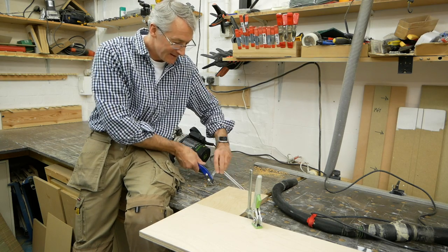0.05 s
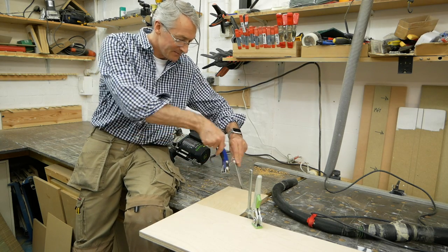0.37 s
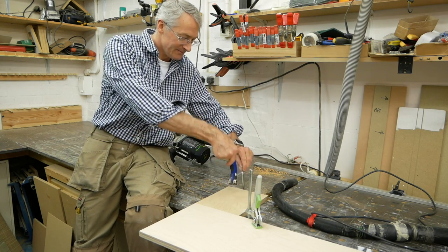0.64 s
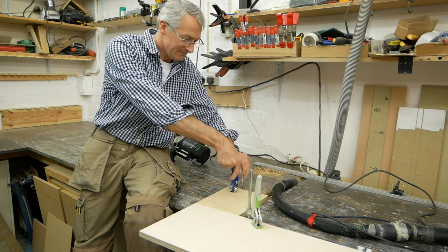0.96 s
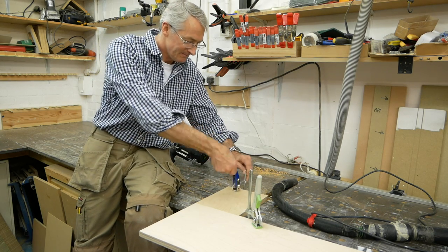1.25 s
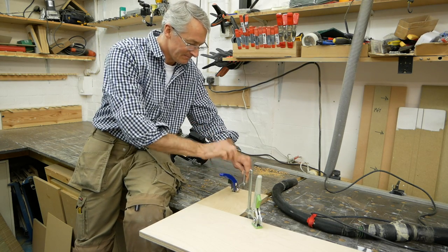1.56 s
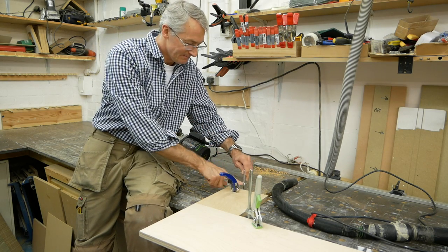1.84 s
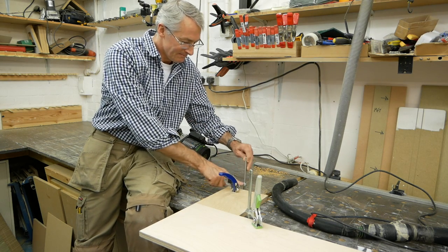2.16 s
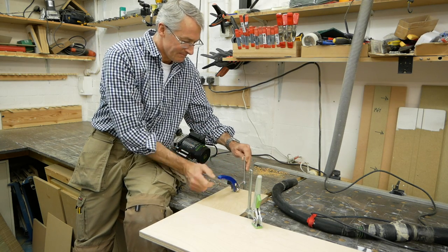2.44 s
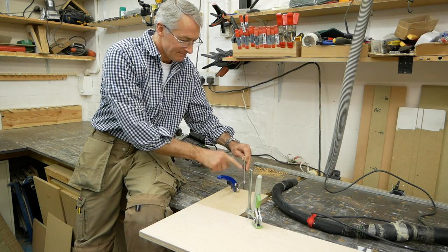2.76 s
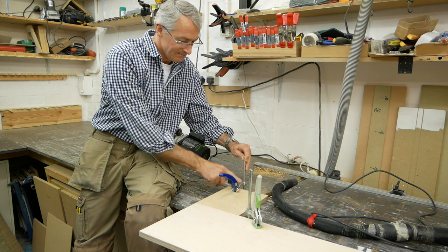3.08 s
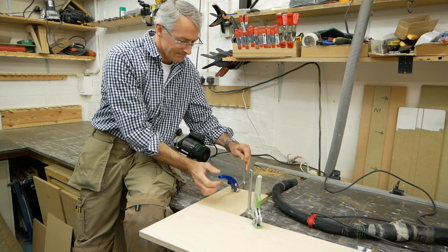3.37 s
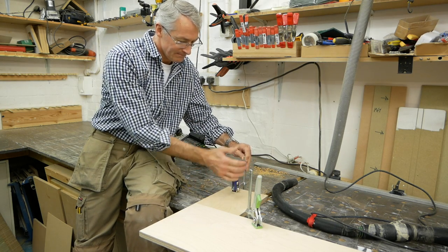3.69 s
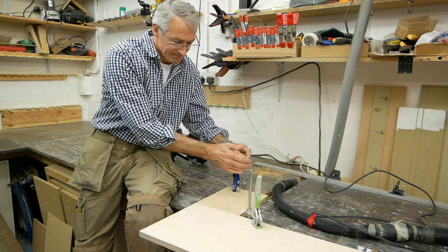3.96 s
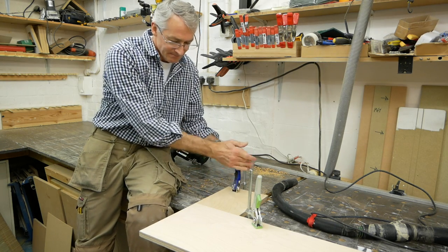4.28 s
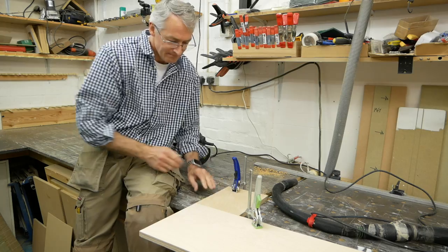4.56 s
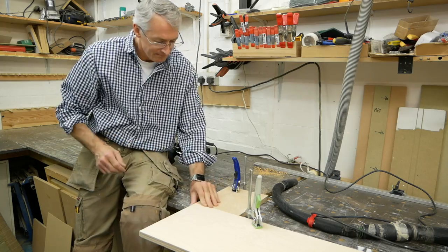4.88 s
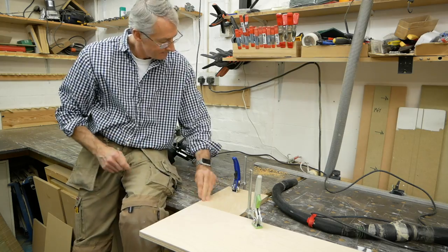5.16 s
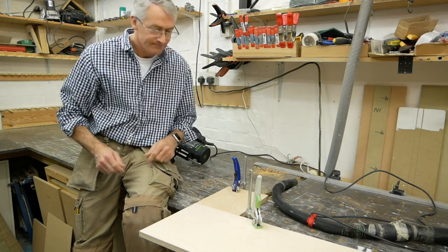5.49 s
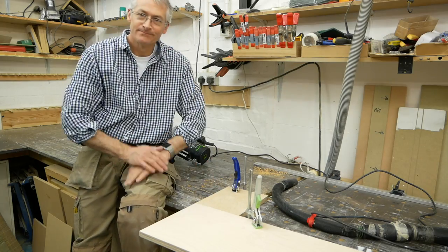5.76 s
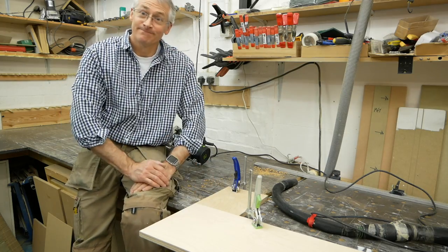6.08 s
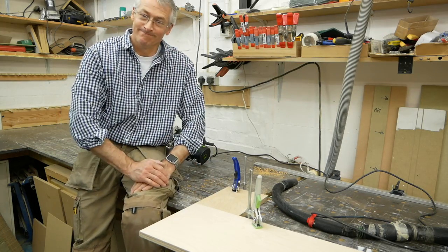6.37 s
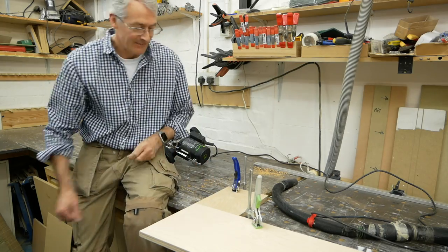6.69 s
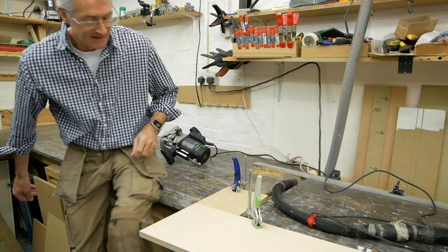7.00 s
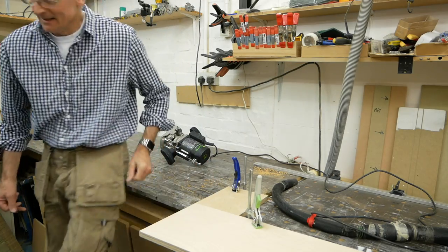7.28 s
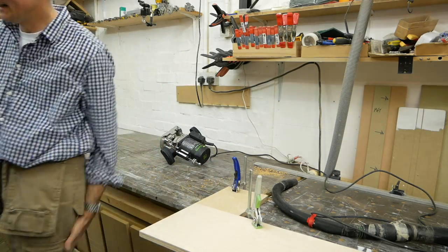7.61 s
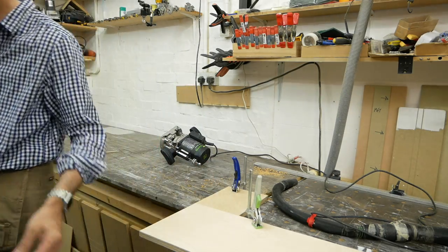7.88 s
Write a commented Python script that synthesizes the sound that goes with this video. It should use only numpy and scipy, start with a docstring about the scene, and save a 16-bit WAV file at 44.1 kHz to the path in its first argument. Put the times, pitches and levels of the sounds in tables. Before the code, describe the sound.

In a small workshop, close to the microphone, someone fits a metal clamp onto a board. Irregular steel clacks and wooden knocks make the bench boom softly. A short scrape leads to a few duller clunks as the screw is turned, then to the sharpest clacks. The second half is much softer, with swishing clothes, a couple of pats and some light footsteps over faint room hiss.

```python
"""A steel clamp is set on a board on a wooden workbench; a man slides its jaw down and screws it tight.
Each impact excites damped modes: the steel clacks and clinks, the board knocks, the bench booms,
and a small workshop reverberates. Stick-slip friction makes the jaw scrape and the bar sing.
He lets go, brushes the board, pats his trousers and walks off in rustling clothes, near one microphone."""
import sys
import numpy as np
from scipy import signal
from scipy.io import wavfile
from scipy.ndimage import uniform_filter1d

SR = 44100
rng = np.random.default_rng(int(sys.argv[2]) if len(sys.argv) > 2 else 0)


def output_pcm(signal):
    """Save a mono or channel-first signal as 16-bit PCM at the path in sys.argv[1].

    Samples are clipped to [-1, 1] before scaling.
    """
    pcm = np.clip(np.atleast_2d(signal).T, -1, 1) * 32767
    wavfile.write(sys.argv[1], SR, np.round(pcm).astype(np.int16))


N = 350154
TIME = np.arange(N) / SR
RING = np.arange(20480) / SR  # time since a blow [s]

# spectra of contact on wood and on thin steel: (frequency [Hz], level [dB])
WOOD_SPECTRUM = [(70, -15.5), (200, 2), (400, 4), (640, -1), (1000, -10.5), (1800, -19), (5000, -60)]
TICK_SPECTRUM = [(1500, -2.5), (4000, 3.5), (6500, 4), (9500, -0.5), (12500, 1.5), (16000, -7.5)]


def amp(db):
    return 10 ** (np.asarray(db) / 20)


def unit_rms(x):
    return x / np.sqrt(np.mean(x ** 2) + 1e-20)


def unit_energy(x):
    return x / np.sqrt(np.sum(x ** 2) + 1e-20)


def with_energy(x, seconds):
    """Energy is power times duration: x gets that of a unit-power sound of this length."""
    return unit_energy(x) * np.sqrt(seconds * SR)


def curve_at(points, hz):
    """Linear interpolation on a log-frequency axis."""
    f, value = np.transpose(points)
    return np.interp(np.log(hz + 1), np.log(f + 1), value)


def add(mix, s, sound):
    part = mix[max(round(s * SR), 0):][:len(sound)]
    part += sound[:len(part)]


def colour(x, spectrum, centre_hz=1000, bump_db=0, octaves=.5):
    """Minimum-phase filtering by a spectrum with an optional broad resonance."""
    hz = abs(np.fft.fftfreq(4096, 1 / SR))
    db = curve_at(spectrum, hz) + bump_db * np.exp(-(np.log2((hz + 1) / centre_hz) / octaves) ** 2)
    response = np.exp(np.conj(signal.hilbert(np.log(amp(db)))))
    taps = np.fft.ifft(response).real
    return signal.oaconvolve(x, unit_energy(taps[:len(taps) // 2]))[:len(x)]


def decay(t60):
    """Exponential damping: 60 dB in t60 seconds."""
    return np.exp(-np.log(1000) * RING / t60)


def ring(modes, centre_hz, favour_db=6):
    """Modal superposition: damped sines of random sign, favoured near the struck spot's resonance."""
    out = np.zeros(len(RING))
    for hz, db, t60 in modes:
        nearness = np.exp(-(np.log2(hz / centre_hz) / 0.37) ** 2)
        out += rng.choice([-1, 1]) * amp(db + favour_db * nearness) * decay(t60) * np.sin(2 * np.pi * hz * RING)
    return unit_energy(out)


def room(build_s):
    """Diffuse reverberation: dense reflections build up, then decay band by band."""
    # reverberation of the workshop: (frequency [Hz], t60 [s])
    decay_times = [(150, 0.56), (600, 0.29), (3600, 0.25), (7000, 0.31), (14000, 0.14)]
    hz, t, bands = signal.stft(rng.standard_normal(len(RING)), SR, nperseg=256)
    absorption = np.exp(-np.log(1000) * t / curve_at(decay_times, hz)[:, None])
    tail = signal.istft(bands * absorption, SR, nperseg=256)[1][:len(RING)]
    return unit_energy(tail * (1 - np.exp(-RING / build_s)))


def impact(chatter_db, chatter_t60, wet_db, build_s):
    """Impulsive excitation: a pulse and brief contact chatter, prolonged by reverberation."""
    chatter = unit_energy(rng.standard_normal(len(RING)) * decay(chatter_t60))
    direct = (RING == 0) + amp(chatter_db) * chatter
    return unit_energy(direct + amp(wet_db) * signal.fftconvolve(direct, room(build_s))[:len(RING)])


def friction(spectrum, grain_db, per_s):
    """Stick-slip friction: random slips of uneven size, smeared by reverberation."""
    slips = (rng.random(N) < per_s / SR) * rng.standard_normal(N)
    slips *= amp(grain_db * np.minimum(rng.exponential(1, N), 4))
    return unit_rms(colour(slips + signal.oaconvolve(slips, room(build_s=0.041))[:N], spectrum))


def strokes(rows, main, second):
    """Friction noise follows speed: two noises swell and fade under each stroke's Gaussian envelope."""
    return sum(amp(db) * np.exp(-.5 * ((TIME - s) / half_s) ** 2) * (main + amp(second_db) * second)
               for s, db, half_s, second_db in rows)


def air():
    """Stationary noise floor: the quiet workshop and the microphone's own hiss."""
    # background spectrum: (frequency [Hz], level [dB])
    floor_spectrum = [(20, -14.5), (92, 5), (560, -14), (2690, -22), (4610, -23.5), (13200, -26),
                      (16000, -23.5)]
    return amp(-56.5) * unit_rms(colour(rng.standard_normal(N), floor_spectrum))


def clothes():
    """Cloth friction: folds rustle and fibres hiss, modulated as they catch and let go."""
    # spectra of folds and of fibres: (frequency [Hz], level [dB])
    fold_spectrum = [(50, 4), (150, 5.5), (330, 4.5), (550, 4.5), (1100, 2), (3700, -0.5), (4800, -11.5),
                     (15000, -28.5)]
    fibre_spectrum = [(2500, -3.5), (6000, -8.5), (13000, -10), (16000, -22)]
    # body movement, its first level held from the start: (time [s], level [dB])
    movement = [(4.6, -53.5), (5.3, -54.5), (5.7, -49.5), (6.3, -62), (6.55, -49), (7.4, -46), (7.94, -54)]
    # the hand brushing the board (4.81 and 5.23 s), then sleeves and trousers: (centre time [s], level [dB],
    # half width [s], relative hiss [dB])
    swishes = [(4.81, -54, 0.063, 5.5), (4.925, -38.5, 0.039, -24), (5.11, -44.5, 0.069, -22),
               (5.23, -50.5, 0.054, 0), (5.94, -54, 0.063, -1), (6.83, -56, 0.033, 0),
               (7.135, -29, 0.052, -12), (7.745, -40.5, 0.061, -2.5)]
    catch_db = unit_rms(signal.sosfilt(signal.butter(2, 25, fs=SR, output="sos"), rng.standard_normal(N)))
    rustle = friction(fold_spectrum, grain_db=1.5, per_s=5000)
    hiss = friction(fibre_spectrum, grain_db=-1, per_s=8300)
    stir = amp(np.interp(TIME, *np.transpose(movement))) * (rustle + amp(-9) * hiss)
    return amp(catch_db) * (stir + strokes(swishes, rustle, hiss))


def bench(boom_db, tilt_db):
    """Rise time sets bandwidth: a slow push swells the deep modes, a quick one the upper ones too."""
    # bench modes: (frequency [Hz], level [dB], t60 [s])
    modes = [(97.86, 8, 0.42), (84.45, -2, 0.42), (67.4, -11, 0.35), (126, -4, 0.42), (155, -1, 0.55),
             (183.8, 1, 0.46), (238.5, -2.5, 0.36), (293, -3, 0.3)]
    build_s = 0.024 * amp(-tilt_db) ** .5
    swell = np.sin(np.pi / 2 * np.minimum(RING / build_s, 1)) ** 2
    # the first swing rings slightly louder, then the level settles a little lower
    damping = 0.66 + 0.069 * np.exp(-(np.maximum(RING - build_s, 0) / 0.064) ** 2)
    boom = sum(amp(db + tilt_db * np.log2(hz / 100)) * decay(t60)
               * np.sin(2 * np.pi * (hz * RING + rng.random())) for hz, db, t60 in modes)
    return amp(boom_db) * swell * damping * boom


def leaning():
    """Transient loading: pushes and dull bumps set the bench vibrating."""
    # loads on the bench top: (time [s], level [dB], tilt [dB/octave])
    pushes = [(0.0, -25, 12), (0.034, -15, 1), (0.12, -16.5, 0), (0.207, -18.5, -6), (0.993, -23, 1),
              (1.124, -30, 0), (2.002, -19.5, -7.5), (2.071, -25, -2), (4.024, -14.5, -9.5),
              (4.396, -15.5, 0.5), (4.425, -15, -6.5), (7.132, -23.5, -4)]
    out = np.zeros(N)
    for s, db, tilt_db in pushes:
        add(out, s, bench(db, tilt_db))
    return out


def bar_ring(tuning):
    """Free vibration of the thin steel bar: the jaw's place sets the ringing length, hence the tuning."""
    # bar modes: (frequency at tuning 1 [Hz], level [dB], t60 [s])
    modes = [(5642, 3, .11), (7251, 0, .25), (8400, -6, .17), (10450, -3, .19), (13216, -4, .2)]
    return ring([(hz * tuning, db, t60) for hz, db, t60 in modes], centre_hz=modes[0][0])


def strike(clack_db, body_db, tick_db, hz, ring_db):
    """Impact on coupled parts: one blow sounds the cast jaw, the board under it and the bar."""
    # spectrum of the jaw's clack: (frequency [Hz], level [dB])
    clack_spectrum = [(300, -50.5), (700, -10.5), (950, -2.5), (1750, -5.5), (3400, -10), (4300, -15.5),
                      (7000, -27.5), (15000, -47.5)]
    # clamp modes: (frequency [Hz], level [dB], t60 [s])
    clamp_modes = [(885, -3, .18), (1281, 1, .13), (1435, -1, .11), (1920, -1, .1), (2045, 9, .014),
                   (2220, 0, .15), (2350, -2, .14), (3030, -4, .09), (3350, -6, .1)]
    softness = np.clip(-clack_db / 20, 0, 1)  # light touches chatter more and build more slowly
    onset = 1 - np.exp(-RING / (.0001 + 0.00093 * softness))
    jaw_hit = impact(5 + 4.7 * softness, chatter_t60=0.023, wet_db=-1.5 + 3.9 * softness, build_s=0.0027)
    clack = unit_energy(colour(jaw_hit, clack_spectrum, hz, bump_db=8.5, octaves=0.27))
    steel = ring(clamp_modes, hz)
    steel = unit_energy(steel + amp(-11) * signal.fftconvolve(steel, room(build_s=0.0013))[:len(RING)])
    wood_hit = impact(chatter_db=2.5, chatter_t60=0.021, wet_db=1.5, build_s=0.0066)
    body = unit_energy(colour(wood_hit, WOOD_SPECTRUM, hz, bump_db=8, octaves=0.93))
    bar_hit = impact(chatter_db=5.5, chatter_t60=0.023, wet_db=-6, build_s=0.001)
    tick = unit_energy(colour(bar_hit, TICK_SPECTRUM))
    bar = bar_ring(tuning=1 + 0.056 * rng.standard_normal())
    return (amp(clack_db) * with_energy(onset * (clack + amp(ring_db) * steel), seconds=0.00047)
            + amp(body_db) * with_energy(onset * body, seconds=0.0061)
            + amp(tick_db) * with_energy(tick + amp(-12.5) * bar, seconds=0.005))


def board_knocks():
    """Structure-borne sound: the clamp bumps the board, which rings and shakes the bench."""
    # bumps: (time [s], clack [dB], wooden body [dB], resonance [Hz], board ring [dB], bench boom [dB])
    knocks = [(0.0168, -1.5, -12.5, 504, -15.5, -21.5), (0.4728, -28.5, -27.5, 550, -38, -29),
              (0.753, -20.5, -23, 503, -26, -28.5), (0.8619, 4, -6, 800, -14.5, -21),
              (1.2978, -15, -21.5, 530, -24, -26), (1.4862, 4.5, -7.5, 1210, -16.5, -16.5),
              (1.6014, -21.5, -20, 672, -25, -23), (1.932, -17.5, -23, 1230, -33, -24),
              (2.0944, -1, -13.5, 2250, -18.5, -23), (3.7539, -4, -12, 700, -21.5, -22.5),
              (3.7835, -4, -19, 520, -11.5, -35), (3.797, -7, -22, 640, -7.5, -39),
              (4.398, -7, -20, 300, -30, -22)]
    # board modes: (frequency [Hz], level [dB], t60 [s])
    board_modes = [(408, -1, .17), (510, 0, .13), (594, 0, .13), (654, 2, .14)]
    out = np.zeros(N)
    for s, clack_db, body_db, hz, board_db, boom_db in knocks:
        add(out, s, strike(clack_db, body_db, tick_db=clack_db - 29, hz=hz, ring_db=-10.5))
        add(out, s, amp(board_db) * with_energy(ring(board_modes, hz, favour_db=11.5), seconds=0.0058))
        add(out, s, bench(boom_db, tilt_db=2.5))
    return out


def jaw_clacks():
    """Brief, hard contact excites a wide band: the jaw snaps against the bar."""
    # snaps: (time [s], clack [dB], wooden body [dB], tick [dB], resonance [Hz], ring re clack [dB])
    clacks = [(0.0173, -1, -16, -25.5, 593, -9), (0.1209, -10.5, -20.5, -35, 1270, -6),
              (0.833, -1, -16, -28, 1720, -4), (0.8482, 4, -16.5, -27, 3250, -12),
              (1.4237, -6.5, -19.5, -45.5, 1530, -1), (1.4696, 4.5, -14, -30, 3030, -4),
              (2.0826, 3, -16.5, -43, 2230, 7.5), (3.7826, 5.5, -17, -12, 2570, -7.5),
              (3.839, 8, -30, -13, 1430, -14), (3.907, 9, -13.5, -15, 1855, -24.5),
              (4.2362, -17.5, -26, -50.5, 1120, -12), (4.2807, 11.5, -19, -12.5, 2120, -4)]
    out = np.zeros(N)
    for s, *settings in clacks:
        add(out, s, strike(*settings))
    return out


def bar_clinks():
    """Free decay: light taps leave the loose bar ringing in its high modes."""
    # taps: (time [s], tick [dB], bar ring [dB], tuning [ratio])
    clinks = [(0.138, -23.5, -27, 1.158), (1.1969, -28.5, -41, 0.96), (1.2444, -34, -49, 1.1),
              (1.3194, -30.5, -37, 0.62), (1.934, -33, -39, 0.81)]
    out = np.zeros(N)
    for s, db, bar_db, tuning in clinks:
        add(out, s, strike(clack_db=db + 8.5, body_db=db - 1, tick_db=db, hz=3550, ring_db=-23))
        add(out, s, amp(bar_db) * with_energy(bar_ring(tuning), seconds=0.0024))
    return out


def sliding():
    """Frictional excitation: steel scrapes, the board grinds, and the dragging jaw sets the bar singing."""
    # jaw, screw and board slide: (centre time [s], scrape [dB], half width [s], relative grind [dB])
    slides = [(0.29, -45.5, 0.061, 5), (0.69, -39, 0.03, 4.5), (2.018, -26.5, 0.035, 3),
              (2.06, -27.5, 0.02, 3), (3.748, -27, 0.0083, 1)]
    # spectrum of steel on steel: (frequency [Hz], level [dB])
    scrape_spectrum = [(400, -21.5), (780, -37), (910, 8.5), (1080, 7), (1700, 2.5), (5500, -7),
                       (15000, -27)]
    # the jaw drags along the bar: (centre time [s], singing [dB], half width [s], tuning [ratio])
    drags = [(0.695, -45, 0.02, .83), (2.04, -37, .035, 0.97)]
    scrape = friction(scrape_spectrum, grain_db=1, per_s=1500)
    grind = friction(WOOD_SPECTRUM, grain_db=3.5, per_s=550)
    out = strokes(slides, scrape, grind)
    grit, grit_db = friction(TICK_SPECTRUM, grain_db=4.5, per_s=500), -7
    for s, db, half_s, tuning in drags:
        singing = unit_rms(signal.oaconvolve(grit, bar_ring(tuning))[:N])
        out += strokes([(s, db, half_s, grit_db)], singing, grit)
    return out


def screw():
    """Backlash: a light touch takes up the handle's play, it clunks, then the twist rocks the bench."""
    # turns: (time [s], clunk [dB], lead of the touch [s], resonance [Hz], bench boom [dB])
    turns = [(2.4197, -13.5, 0.011, 1670, -19), (3.014, -8, 0.023, 1300, -20.5),
             (3.2216, -16, .035, 1570, -22)]
    touch_db, twist_lag_s = -11.5, 0.01404
    out = np.zeros(N)
    for s, clunk_db, lead_s, hz, boom_db in turns:
        for at, db in (s - lead_s, clunk_db + touch_db), (s, clunk_db):
            add(out, at, strike(clack_db=db, body_db=0.53 * db - 16, tick_db=db - 34.5, hz=hz, ring_db=0.5))
        add(out, s + twist_lag_s, bench(boom_db, tilt_db=-5))
    return out


def soft_blows():
    """Damped impacts: soft pats, footsteps and a dull bump against the bench, each a slap and a thud."""
    # blows: (time [s], slap [dB], thud [dB], thud resonance [Hz])
    blows = [(5.893, -30, -46, 65), (6.444, -29, -32, 111.4), (6.742, -59, -31, 230),
             (7.538, -32.5, -38.5, 318), (7.663, -27.5, -30.5, 740), (7.794, -27.5, -29.5, 376)]
    # spectra of slap and thud: (frequency [Hz], level [dB])
    slap_spectrum = [(150, -13), (600, 9), (2000, 0), (3600, -1), (5000, -13), (15000, -70)]
    thud_spectrum = [(40, -24), (150, -3.5), (300, -9), (600, -17.5), (3000, -43)]
    out = np.zeros(N)
    for s, slap_db, thud_db, hz in blows:
        slap = colour(impact(chatter_db=22, chatter_t60=0.03, wet_db=3, build_s=0.0027), slap_spectrum)
        soft_hit = impact(chatter_db=-3, chatter_t60=0.04, wet_db=-3, build_s=0.01)
        thud = colour(soft_hit, thud_spectrum, hz, bump_db=12)
        add(out, s, amp(slap_db) * with_energy(slap, seconds=0.0071))
        add(out, s, amp(thud_db) * with_energy(thud, seconds=0.016))
    return out


def scene():
    """Superposition at one microphone, whose two channels are nearly alike."""
    clamp = board_knocks() + jaw_clacks() + bar_clinks() + screw()
    mono = clamp + leaning() + sliding() + soft_blows() + clothes() + air()
    envelope = np.sqrt(abs(uniform_filter1d(mono ** 2, size=1024)))
    # a faint noise that swells with the sound sets the channels slightly apart
    roughness = unit_rms(colour(rng.standard_normal(N), [(300, 7), (15000, -4.5)]))
    side = (amp(-69.5) + amp(-38.5) * envelope) * roughness
    return np.array([mono + side, mono - side])


def record(dry):
    """Saturation: the hardest blows overload the input; a low-pass then limits the band."""
    clipped = dry / (1 + dry ** 8) ** (1 / 8)
    low_pass = signal.firwin(255, 16200, window=("kaiser", 8), fs=SR)
    return signal.oaconvolve(clipped, low_pass[None], "same")


dry = scene()
out = record(dry)
output_pcm(out)
```